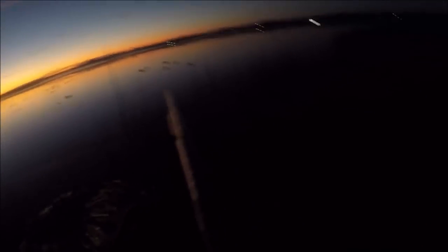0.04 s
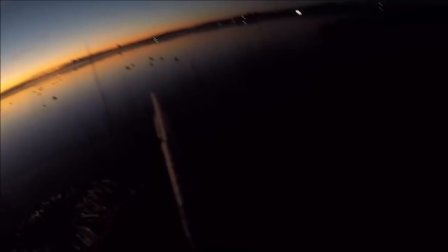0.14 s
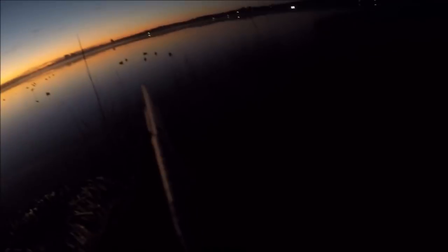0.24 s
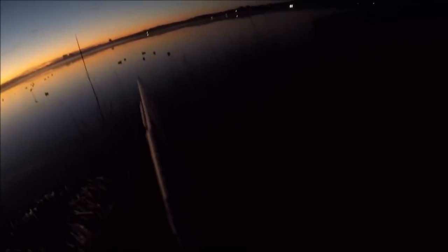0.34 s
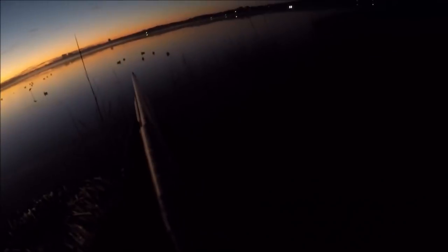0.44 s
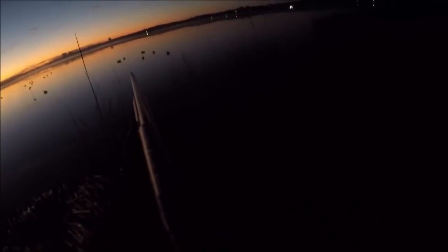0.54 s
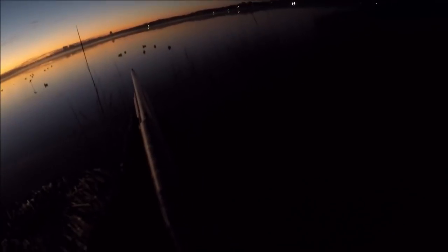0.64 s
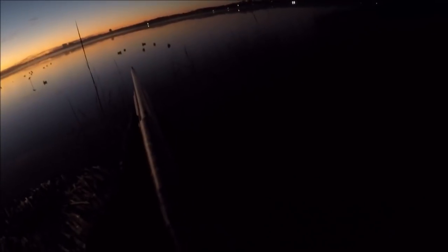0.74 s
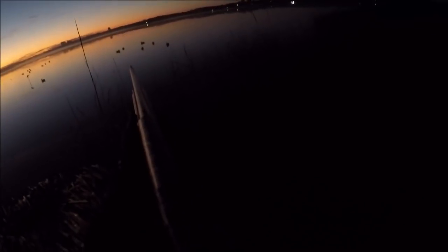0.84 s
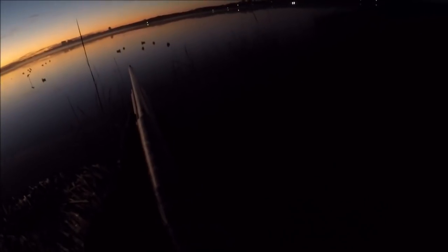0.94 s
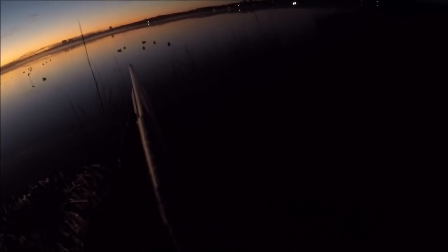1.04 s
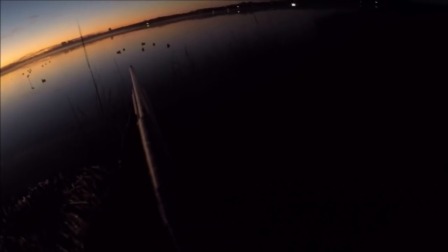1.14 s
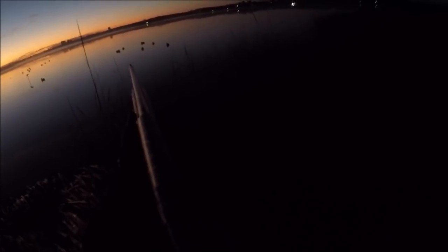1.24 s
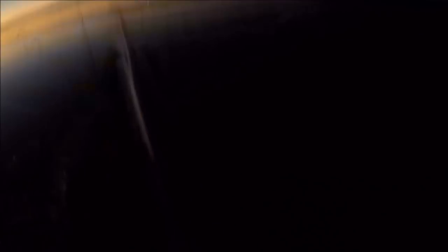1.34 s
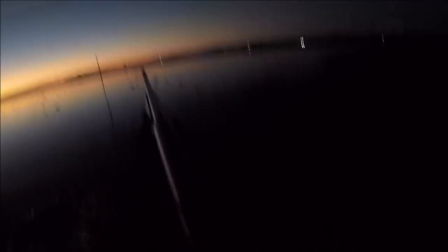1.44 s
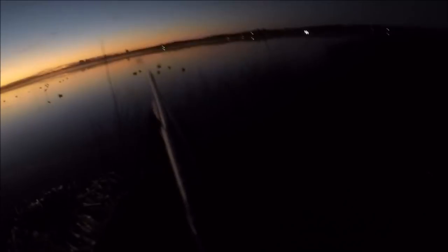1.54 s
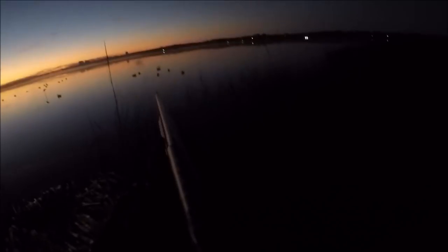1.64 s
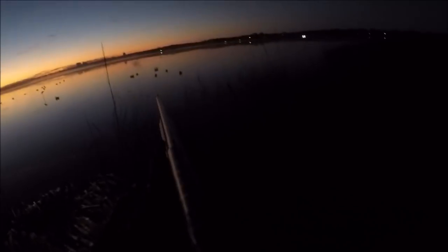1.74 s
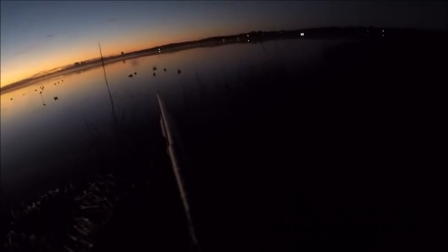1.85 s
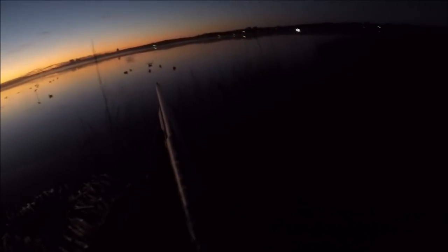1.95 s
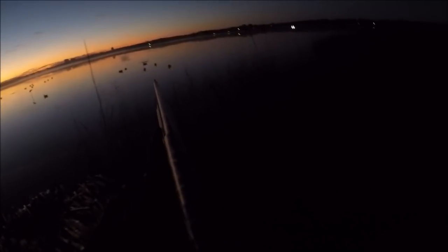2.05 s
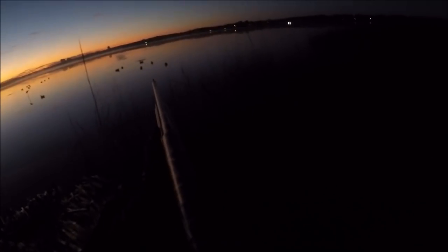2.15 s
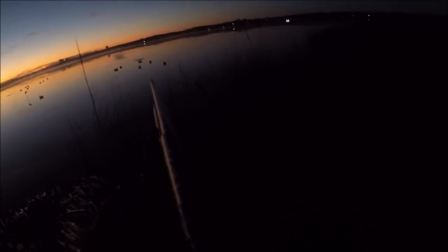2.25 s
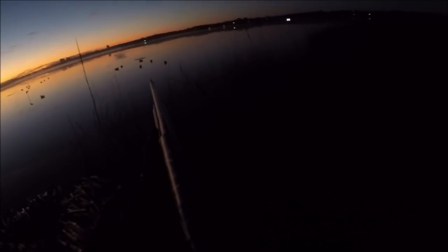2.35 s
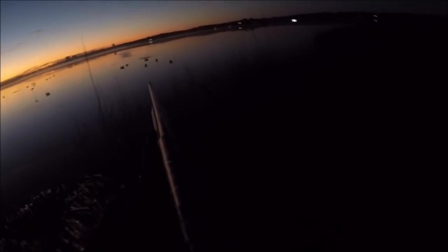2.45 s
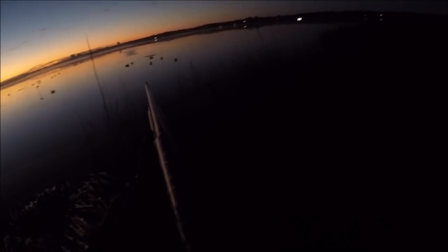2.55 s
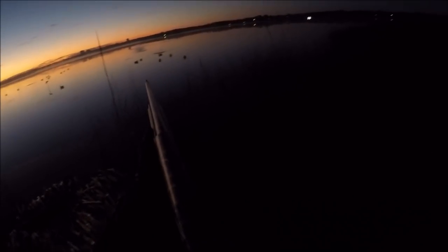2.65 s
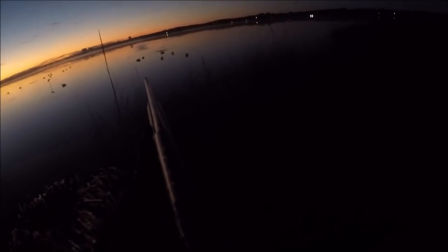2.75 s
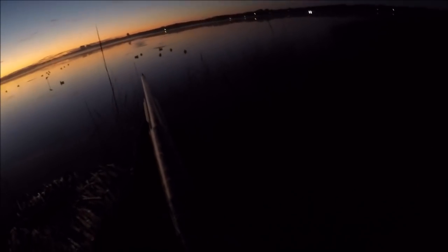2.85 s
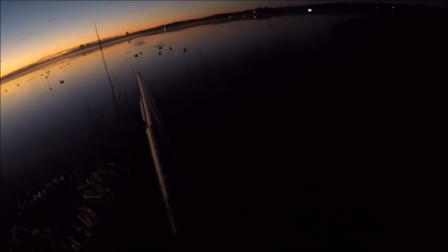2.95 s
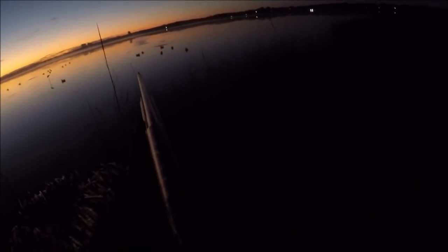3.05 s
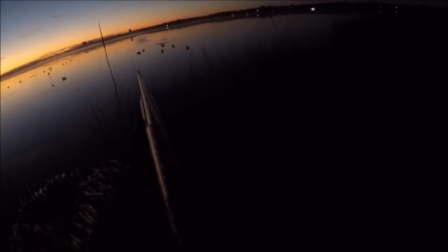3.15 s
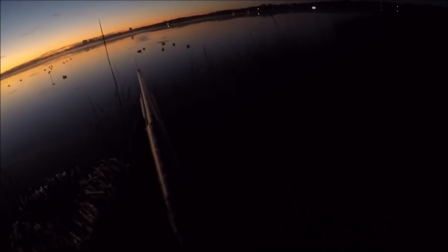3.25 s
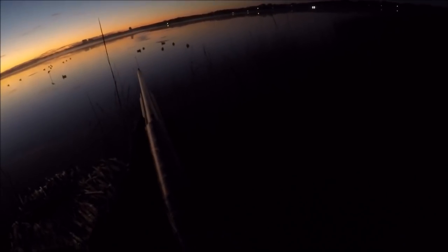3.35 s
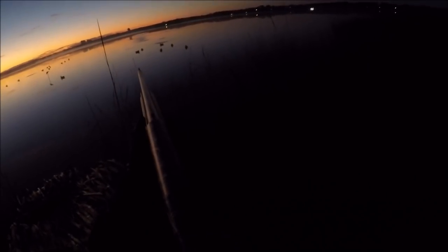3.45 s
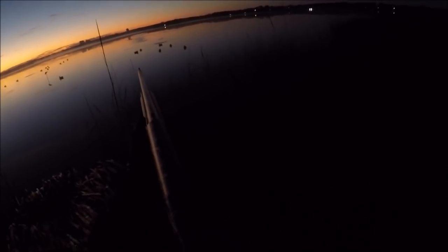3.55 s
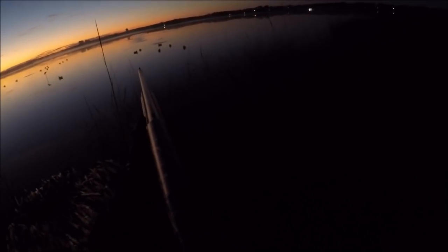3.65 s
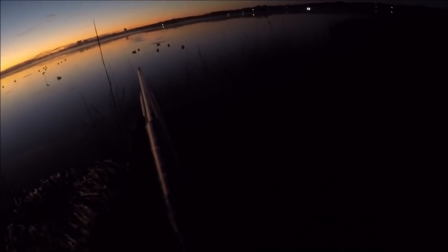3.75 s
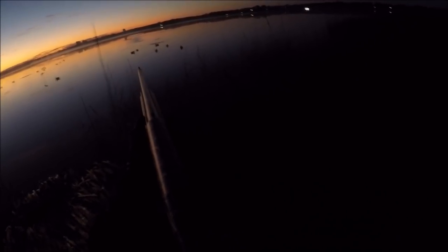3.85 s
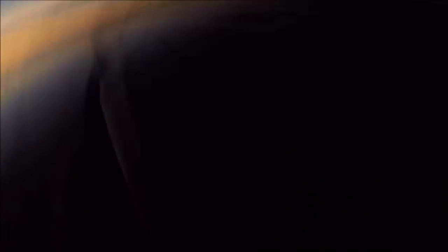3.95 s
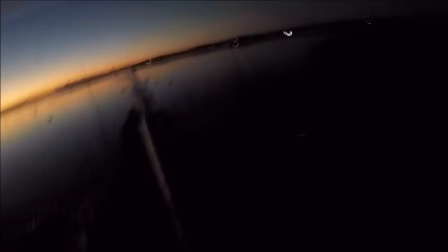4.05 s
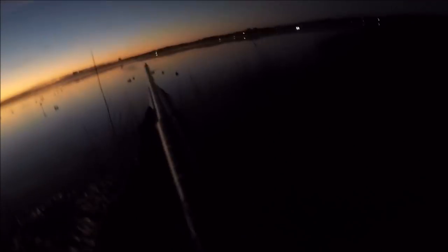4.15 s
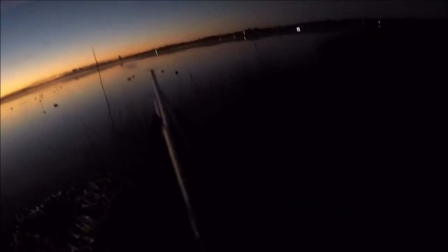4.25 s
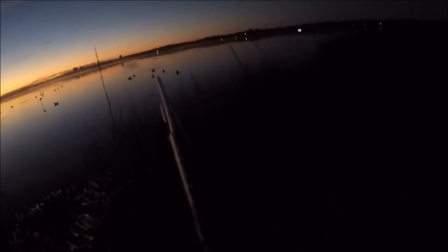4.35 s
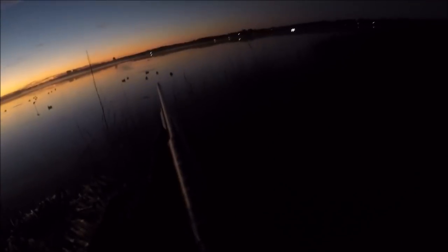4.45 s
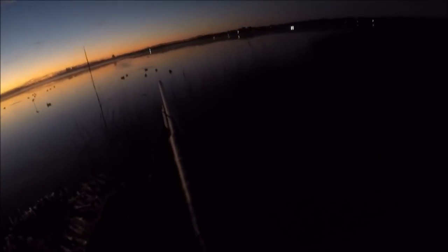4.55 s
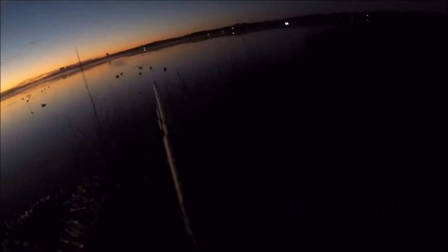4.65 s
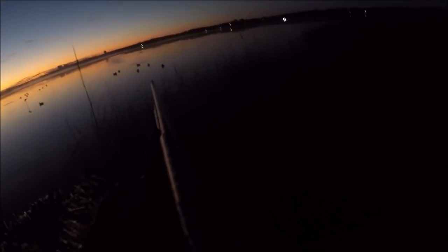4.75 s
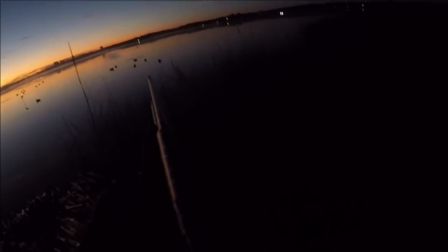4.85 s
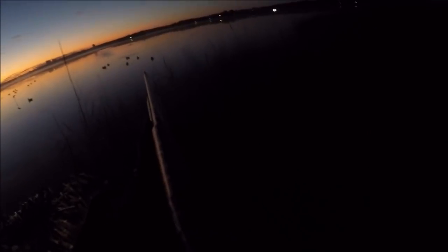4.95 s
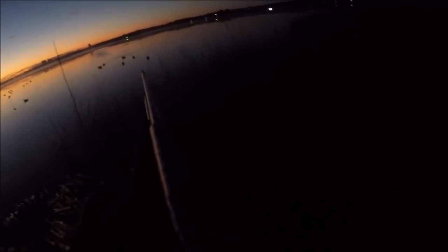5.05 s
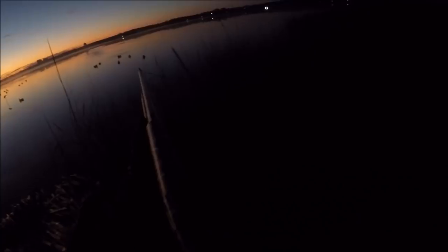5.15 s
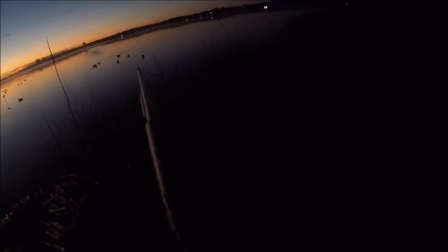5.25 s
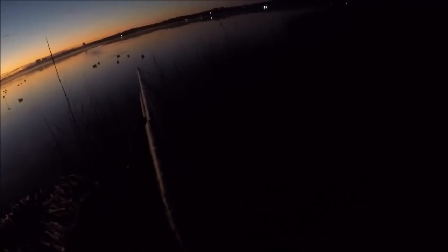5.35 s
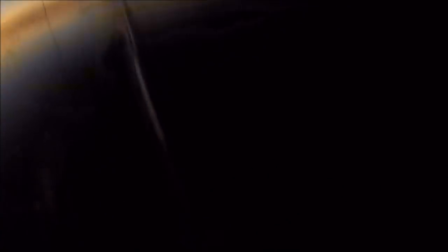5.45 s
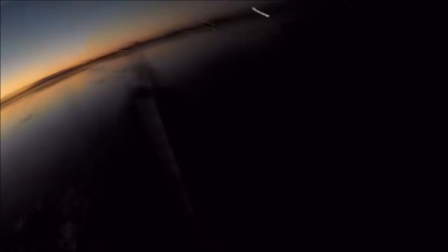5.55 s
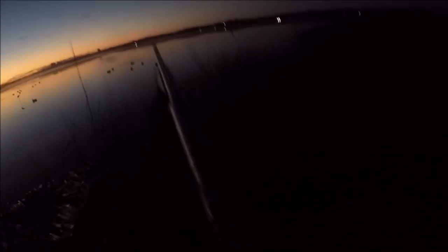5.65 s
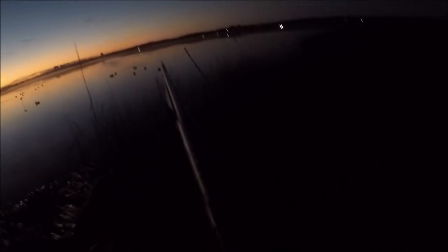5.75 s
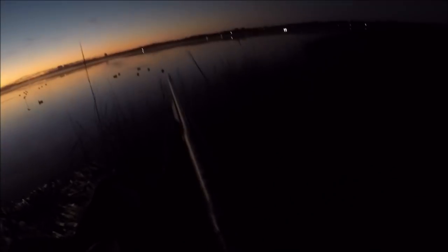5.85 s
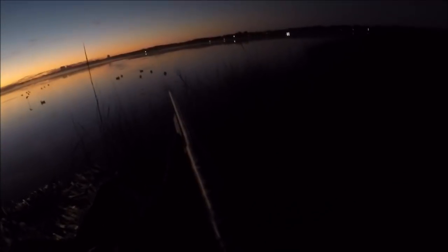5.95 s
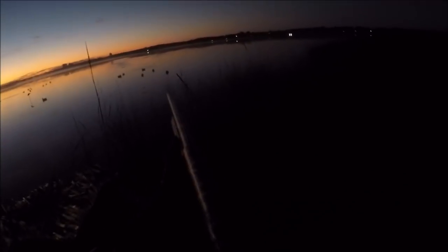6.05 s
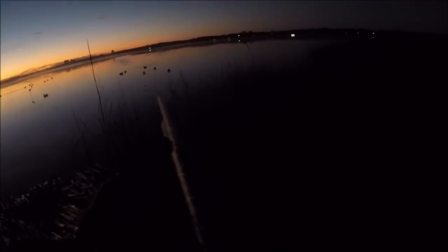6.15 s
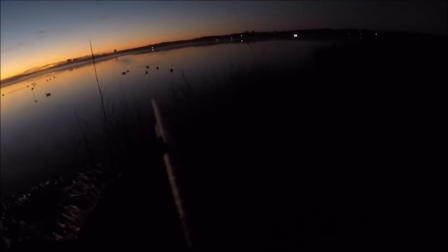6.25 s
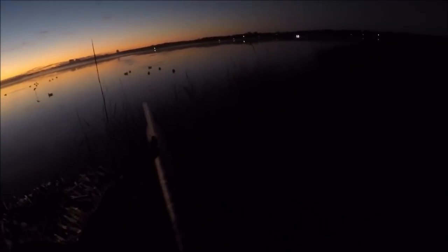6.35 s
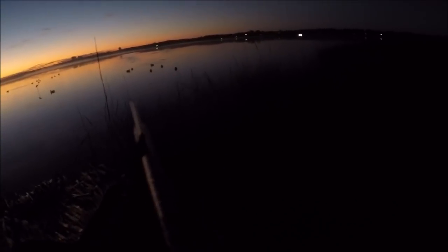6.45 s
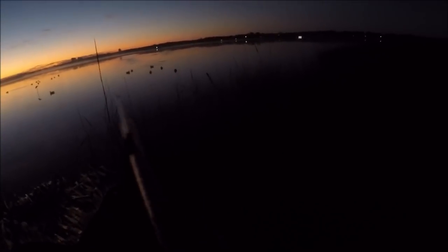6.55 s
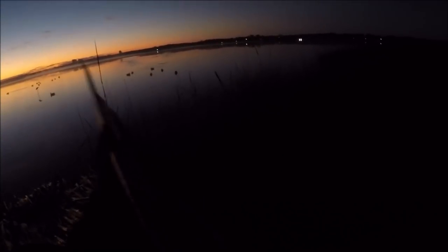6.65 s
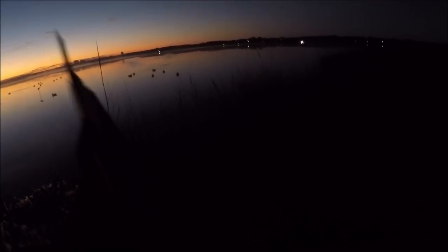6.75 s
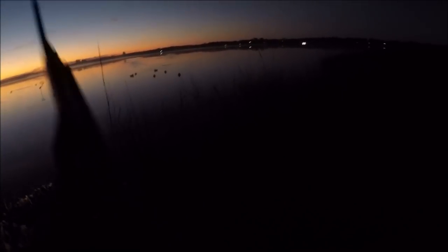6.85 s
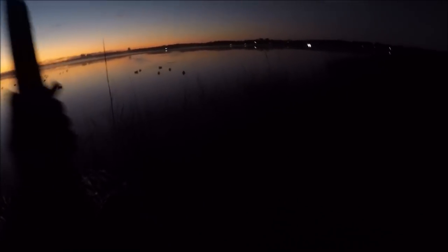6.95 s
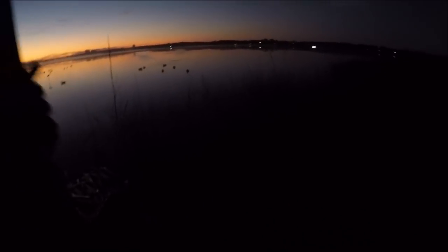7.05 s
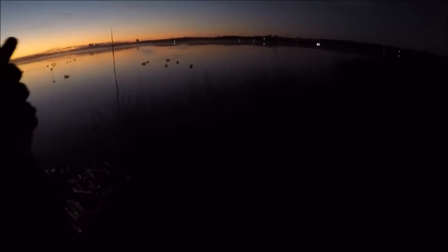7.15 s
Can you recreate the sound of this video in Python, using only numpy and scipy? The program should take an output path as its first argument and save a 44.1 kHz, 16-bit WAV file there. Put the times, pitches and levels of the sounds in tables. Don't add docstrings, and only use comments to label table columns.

```python
import sys
import numpy as np
from scipy import signal
from scipy.fft import rfft, irfft, next_fast_len
from scipy.io import wavfile

SR = 44100
rng = np.random.default_rng(int(sys.argv[2]) if len(sys.argv) > 2 else 0)


def store_wav(level_fs):
    pcm = np.round(np.clip(np.atleast_2d(level_fs), -1, 1) * 32767)
    wavfile.write(sys.argv[1], SR, pcm.T.astype(np.int16))


def gain_from_decibels(decibels):
    exponent = np.asarray(decibels, float) / 20
    return 10 ** exponent


N = 318181

# last_jolt_s, jolt_db, crack_db, duck_to_db, echo_db
SHOTS = [
    (1.3082, -19, -10.5, -22.5, 1.5),
    (3.906, -18, -12.5, -23, -1),
    (5.4228, -24, -12.5, -23.5, -4),
]
# hz, level_db_per_hz
CRACK = [(210, -32.5), (350, 0.5), (671, -7), (1210, -0.5), (1920, -5.5), (2720, -2.5), (4440, -3),
         (5210, -5.5), (7630, -7), (8940, -20.5), (13100, -26.5), (15600, -39)]
# hz, likeness (-1 to 1)
BLAST_LIKENESS = [(60, 0.89), (130, 0.86), (290, -0.86), (640, 0.76), (1410, -0.27), (3100, 0.69),
                  (6820, -0.49), (15000, -0.2)]


def rms_one(x):
    return x / np.sqrt(np.mean(x ** 2) + 1e-20)


def at_hz(points, hz):
    point_hz, value = np.transpose(points)
    return np.interp(np.log(hz), np.log(point_hz), value)


def panned(db):
    return gain_from_decibels([[db / 2], [-db / 2]])


def bandpass(order, low_hz, high_hz):
    return signal.butter(order, [low_hz, high_hz], "band", fs=SR, output="sos")


def drift(rate_hz):
    pole = np.exp(-80 * np.pi * rate_hz / SR)
    noise = rng.standard_normal(N // 40 + 2002)
    slow = rms_one(signal.lfilter([1], [1, -2 * pole, pole * pole], noise)[2000:])
    return np.interp(np.arange(N) / 40, np.arange(len(slow)), slow)


def coloured(spectrum, likeness, size):
    padded = next_fast_len(size, True)
    hz = np.maximum(np.fft.rfftfreq(padded, 1 / SR), 1)
    alike = np.clip(at_hz(likeness, hz), -.99, .99)
    mid, side = rfft(rng.standard_normal((2, padded)))
    both = np.sqrt(1 + alike) * mid + np.sqrt(1 - alike) * side * [[1], [-1]]
    return rms_one(irfft(both * gain_from_decibels(at_hz(spectrum, hz)), padded)[:, :size])


def envelope(t, db, rise_s, t60_s):
    rise = np.clip(1 + t / rise_s, 0, 1) ** 2
    fall = gain_from_decibels(-60 * np.maximum(t, 0) / t60_s)
    return np.where(t < 0, rise, fall) * gain_from_decibels(db)


def bursts(rows):
    t, gate = np.arange(-4000, 30000) / SR, np.zeros(N)
    for s, db, rise_s, t60_s in rows:
        at = int(s * SR)
        gate[at - 4000:at + 30000] += envelope(t, db, rise_s, t60_s)
    return gate * coloured(CRACK, BLAST_LIKENESS, N)


def swells(rows, pan_db, lag_rad=0):
    out, sides = np.zeros((2, N)), lag_rad * np.array([[.5], [-.5]])
    for s, hz, db, rise_s, fall_s in rows:
        start = int((s - .1) * SR)
        t = np.arange(start, start + 11000) / SR - s
        swell = np.exp(-.5 * (t / np.where(t < 0, rise_s, fall_s)) ** 2)
        wave = np.cos(2 * np.pi * hz * t + sides)
        out[:, start:start + 11000] += gain_from_decibels(db) * swell * wave * panned(pan_db)
    return out


def metal(rows, spread, snap_db, trim_db):
    out, t = np.zeros((2, N + 4000)), np.arange(4000) / SR - .0012
    flat = np.vstack([bandpass(3, 850, 8800), signal.butter(1, 3000, fs=SR, output="sos")])
    for s, db, hz, pan_db, t60_s in rows:
        noise = rng.standard_normal((3, 4000)) * envelope(t, 0, .0005, t60_s)
        burst = noise[0] + .32 * noise[1:]
        tone = signal.sosfilt(bandpass(2, hz / spread, hz * spread), burst)
        both = tone + gain_from_decibels(snap_db) * signal.sosfilt(flat, burst)
        at = int(s * SR)
        out[:, at:at + 4000] += both / np.abs(both).max() * gain_from_decibels(db + trim_db) * panned(pan_db)
    return out[:, :N]


def gain_control(now):
    duck_s, hold_s, recover_db_per_s, knee_db = .18, .56, 16.5, 2.5
    gain_db = np.zeros_like(now)
    for s, _, _, duck_db, _ in SHOTS:
        climb_db = duck_db + recover_db_per_s * np.maximum(now - s - hold_s, 0)
        back_db = -knee_db * np.log1p(np.exp(-climb_db / knee_db))
        gain_db = gain_db + np.clip((now - s) / duck_s, 0, 1) * (back_db - gain_db)
    return gain_db


def echo(now, late_s, db, rise_s, t60_s):
    return sum(envelope(now - shot[0] - late_s, db + shot[4], rise_s, t60_s) ** 2 for shot in SHOTS)


def shifting(now):
    # start_s, length_s, thump_db, cloth_db
    shifts = [(-.1, 0.33, -54, -50.5), (0.274, 0.093, -59.5, -61.5), (0.742, 0.48, -63.5, -69.5),
              (2.66, 0.2, -91.5, -85), (2.813, 0.21, -68, -78), (3.462, 0.22, -62, -73.5),
              (4.777, 0.11, -76, -81.5), (5.298, .12, -62, -88), (6.586, .35, -76.5, -76),
              (6.82, 0.52, -68, -76)]
    thump, cloth = 0, 0
    for s, length_s, thump_db, cloth_db in shifts:
        off = (now - s - length_s / 2) / (length_s / 2 + .046)
        hold = (1 + off ** 6) ** -3.0
        thump = thump + gain_from_decibels(2 * thump_db) * hold
        cloth = cloth + gain_from_decibels(2 * cloth_db) * hold
    return thump, cloth


def marsh():
    # hz, level_db_per_hz
    wind = [(8, -10.5), (15, 5.5), (30, 5), (50, -4), (75, -14.5), (120, -24), (170, -49.5)]
    # hz, level_db_per_hz
    rumble = [(76, -36), (130, -9), (200, -1), (263, -3), (303, -5), (339, -6.5), (600, -14.5), (780, -47),
              (1320, -120)]
    # hz, level_db_per_hz
    wash = [(500, -40.5), (700, -17.5), (900, -13.5), (1020, -4.5), (1180, -5), (1320, -6), (1450, -9),
            (1750, -9), (2000, -16.5), (2600, -22.5), (4000, -45)]
    # hz, level_db_per_hz
    hiss = [(1200, -24), (1800, -1), (2500, -4.5), (4200, -4.5), (4800, -6.5), (6500, -4.5), (8000, -14),
            (9500, -26.5), (12400, -49.5)]
    # hz, level_db_per_hz
    air = [(88, -23.5), (150, -5), (264, -13.5), (480, -15.5), (650, -16.5), (830, -20.5), (1350, -25),
           (4670, -38), (7600, -34.5), (10200, -36.5), (12000, -44.5), (13500, -50), (15600, -62)]
    # hz, level_db_per_hz
    ring = [(800, -34), (1000, -5), (1200, 0.5), (1400, -5), (1900, -32)]
    # hz, level_db_per_hz
    boom = [(45, -29.5), (80, -5), (130, -4.5), (230, 2.5), (300, -3.5), (420, -33.5)]
    # hz, likeness (-1 to 1)
    likeness = [(60, 0.92), (130, -0.059), (290, 0.3), (640, -0.18), (1410, -0.53), (3100, 0.32),
                (6820, -0.12), (15000, -0.63)]
    # time_s, level_db
    gust = [(0, -16), (.15, -0.5), (.4, 5.5), (.8, -1), (1.2, -3), (2.0, 2), (3.1, -3), (3.85, 4),
            (4.6, -0.5), (5.3, -2), (6.2, -3), (7.21, 1)]
    # full_gain_db, ducking_share, breeze_share
    beds = [
        (-46, 0.78, 0.75),
        (-66, 0.46, 0.26),
        (-66, 0.61, .5),
        (-71.5, .8, .6),
        (-59, 1, 0.11),
    ]
    # crest_after_shot_s, level_db, rise_s, t60_s
    echoes = [
        (.06, -48, .05, .6),
        (0.038, -49, 0.046, 1.58),
        (.27, -58, 0.23, 1.11),
        (0.19, -57.5, .2, 1.22),
    ]
    # crest_after_shot_s, level_db, rise_s, t60_s
    ring_echo = (0.5, -69.5, 0.5, 3)
    # crest_from_shot_s (negative is before), level_db, rise_s, t60_s
    boom_swell = (-0.02, -53, 0.23, 0.64)

    now = np.arange(0, N + 32, 32) / SR
    gain_db, gust_db = gain_control(now), np.interp(now, *np.transpose(gust))
    power = [gain_from_decibels(2 * (db + ducks * gain_db + gusts * gust_db)) for db, ducks, gusts in beds]
    for k, shape in enumerate(echoes):
        power[k] += echo(now, *shape)
    thump, cloth = shifting(now)
    power[1] += thump
    power[2] += gain_from_decibels(-4) * np.sqrt(thump * cloth)
    power[3] += cloth
    power[4] += gain_from_decibels(3.5) * cloth
    power += [echo(now, *ring_echo), echo(now, *boom_swell)]

    # spectrum, trim_db, wander_db, wander_hz
    layers = [(wind, 0, .73, 6.5), (rumble, -2, 1.2, 20.5), (wash, -1, .77, 12), (hiss, -4, 2.2, 70),
              (air, 0, .56, 2.4), (ring, 0, 1.2, 14), (boom, 0, 1.9, 25)]
    out = np.zeros((2, N))
    for bed_power, (spectrum, trim_db, wander_db, wander_hz) in zip(power, layers):
        level = np.interp(np.arange(N) / 32, np.arange(len(now)), np.sqrt(bed_power))
        out += level * gain_from_decibels(trim_db + wander_db * drift(wander_hz)) * coloured(spectrum, likeness, N)
    return out


def faint():
    # start_s, length_s, centre_hz, width_hz, rms_db
    faint_rows = [(1.711, 0.096, 1196, 220, -64), (1.44, .2, 110, 80, -59), (4.05, .12, 105, 50, -58),
                  (5.62, .09, 100, 50, -61), (1.34, .2, 250, 160, -50), (4.0, .25, 260, 160, -55),
                  (2.12, .09, 150, 100, -66), (5.62, .16, 1550, 500, -64), (5.6, .2, 300, 150, -60),
                  (4.749, .13, 1900, 401, -77.5), (2.675, 0.041, 5360, 2390, -70),
                  (2.728, 0.065, 5230, 2435, -72.5), (2.765, 0.025, 1820, 300, -69),
                  (2.78, .07, 2040, 300, -75), (2.87, 0.13, 2045, 240, -71), (3.02, 0.031, 2000, 200, -75),
                  (4.875, 0.04, 5400, 3000, -78), (6.624, 0.19, 6400, 3970, -73.5),
                  (2.763, .5, 510, 435, -65), (3.2, 0.52, 525, 436, -64), (6.852, 0.39, 710, 500, -69)]
    out = np.zeros((2, N + SR))
    due_s = np.arange(5.7, N / SR, .193)
    quacks = [(s, .096, 663 * partial, 130, -69.5 + .97 * gain_db)
              for s, gain_db in zip(due_s, gain_control(due_s)) for partial in (4, 5)]
    for s, length_s, hz, width_hz, db in [*faint_rows, *quacks]:
        at, size = int(s * SR), int(length_s * SR)
        band = bandpass(2, hz - width_hz / 2, hz + width_hz / 2)
        call = rms_one(signal.sosfilt(band, rng.standard_normal((2, 26000))))[:, -size:]
        out[:, at:at + size] += gain_from_decibels(db) * call * np.hanning(size) ** .5
    return out[:, :N]


def beacon():
    late_s = [3.09, 3.3, 4.63, 5.96]
    due_s = np.arange(.0218, N / SR - .01, .1024)
    late = np.abs(due_s[:, None] - late_s).min(axis=1) < .02
    pulses = np.zeros(N)
    pulses[((due_s + .007 * late) * SR).astype(int)] = gain_from_decibels(rng.normal(0, 1, len(due_s)))
    bump = np.exp(-.5 * (np.arange(-400, 401) / SR / .0014) ** 2)
    highpass = signal.butter(2, 24, "high", fs=SR, output="sos")
    tug = signal.sosfilt(highpass, np.convolve(pulses, bump, "same"))
    return tug * gain_from_decibels(-34 + gain_control(np.arange(N) / SR))


def knock():
    # start_s, level_db
    blows = [(0.064, -43), (.072, -38), (0.0805, -30), (0.084, -61), (0.0856, -24.5)]
    # hz, level_db, t60_s
    case = [(154, -10.5, 0.21), (200, 4.5, 0.12), (300, 5, 0.062), (348, 5.5, 0.054), (506, 1.5, 0.089),
            (710, -2.5, 0.03)]
    out, t = np.zeros(N), np.arange(12000) / SR
    ring = sum(gain_from_decibels(db - 60 * t / t60_s) * np.sin(2 * np.pi * hz * t) for hz, db, t60_s in case)
    for s, db in blows:
        at = int(s * SR)
        out[at:at + 12000] += gain_from_decibels(db - 5) * ring * np.minimum(t / .0021, 1)
    return out


def buckle():
    # start_s, peak_db
    ticks = [(6.19, -68.5), (6.2352, -60), (6.246, -66), (6.2664, -66), (6.2865, -60), (6.334, -56.5),
             (6.385, -69), (6.445, -71), (6.62, -60), (6.645, -66.5), (6.81, -64.5), (6.9237, -56)]
    return metal([(s, db, 1560, .5, .0097) for s, db in ticks], spread=1.18, snap_db=-7.5, trim_db=3)


def rattles():
    # start_s, peak_db, hz, left_right_db
    fittings = [(0.0044, -38.5, 1980, -12), (0.0776, -44.5, 2250, -20), (0.4665, -49.5, 5100, -5),
                (0.4992, -53, 1890, -9), (0.827, -47, 2470, -1), (1.6583, -49, 3720, 3),
                (1.6718, -46.5, 1920, -1), (1.697, -46, 2460, 3), (1.7485, -56, 2800, -6),
                (2.0795, -64, 2040, 3), (2.1494, -67, 2850, 8), (4.0215, -50, 3202, -3),
                (4.2146, -55, 4270, 2), (4.255, -49, 2820, 2), (4.283, -56, 3550, 6),
                (4.3019, -49, 3740, -3), (4.348, -50, 2894, 4), (4.438, -54, 2010, 6.5),
                (4.6175, -53.5, 2674, 2.5), (4.288, -58, 5000, 1), (4.326, -61, 3700, 1),
                (4.339, -61, 6500, 1), (4.3445, -58, 2900, 1), (4.399, -64, 6500, 1), (4.448, -65, 3000, 1),
                (5.8445, -59.5, 6020, 1), (5.942, -65, 6000, 1), (5.961, -68, 4500, 1),
                (6.038, -67, 2790, 1), (6.198, -68, 2203, 1), (4.897, -68, 1700, 1), (4.925, -70, 2500, 1),
                (1.712, -58, 6500, 1), (.371, -57, 6500, -3), (1.352, -38, 4000, 1), (1.427, -49, 3000, 1),
                (3.947, -41, 2500, 1), (5.872, -59, 1900, -1), (5.5424, -51, 5720, 4),
                (5.8487, -55.5, 2480, 1.5), (5.8655, -55, 4000, -4), (5.985, -61, 4240, -7.5),
                (6.0092, -57.5, 4010, 0.5), (4.36, -57, 4000, -1.5), (4.4544, -65, 2300, 0),
                (4.553, -69, 2500, 1), (6.8688, -56, 1900, -1.5)]
    # start_s, peak_db, hz, left_right_db, t60_s
    bolt = [(4.0662, -46.5, 6100, -2, 0.015), (4.077, -45, 2800, 0, 0.017), (1.3, -52, 6500, 0, 0.022)]
    rows = [(*row, .01) for row in fittings] + [*bolt]
    return metal(rows, spread=1.35, snap_db=1.5, trim_db=3)


def shells():
    # start_s, peak_db, hz, left_right_db, t60_s
    shell_rows = [(0.044, -42, 1560, -10, 0.025), (0.14, -40.5, 1740, -11, 0.026),
                  (4.376, -50.5, 1280, -14, 0.033), (4.842, -56, 1300, -3, .022),
                  (5.897, -44, 1500, -14.5, 0.024), (6.896, -51, 1260, -8, 0.053)]
    return metal(shell_rows, spread=1.45, snap_db=-10.5, trim_db=-1.5)


def action():
    # start_s, peak_db, hz, left_right_db, t60_s
    strikes = [(1.499, -30, 5140, -4, 0.053), (1.5054, -32.5, 3780, 1, 0.055), (4.0906, -33, 6616, 6, 0.07),
               (4.0974, -33, 3950, 0, 0.037), (5.4651, -38, 4144, 2, 0.06)]
    return metal(strikes, spread=1.4, snap_db=-8, trim_db=-2.5)


def recoil():
    # crest_s, hz, peak_db, rise_s, fall_s
    stock = [
        (1.309, 141.5, -17, 0.0079, 0.0065),
        (3.9098, 143.9, -13.5, 0.012, 0.0031),
    ]
    # left_right_db, right_lag_rad
    stock_sides = [(6, .6), (2.5, .3)]
    # crest_s, hz, peak_db, rise_s, fall_s
    barrel = [
        (1.3245, 270, -21.5, 0.0074, .008),
        (3.9222, 250, -26.5, 0.013, 0.0044),
        (5.4403, 230, -24.5, 0.0081, 0.0041),
        (5.4243, 560, -25, 0.0029, 0.0049),
    ]
    # crest_s, hz, peak_db, rise_s, fall_s
    heaves = [(1.355, 22.5, -39, .02, 0.036), (3.955, 26.2, -39, .02, 0.032),
              (5.455, 11.2, -31.5, .012, 0.019), (5.503, 80, -29, 0.005, .003),
              (1.405, 27, -43.5, .012, 0.016), (1.49, 31, -42, 0.014, 0.02), (4.165, 38, -47, .012, 0.012)]
    # crest_s, hz, peak_db, rise_s, fall_s
    rebounds = [(5.4368, 99.8, -24, 0.0019, .005), (5.512, 45, -28.5, .004, 0.016)]
    # peak_db, left_right_db
    spring = [(-36, -12), (-37, -4.5), (-41.5, 4)]
    out = swells(barrel, pan_db=-1, lag_rad=.5001)
    out += swells(heaves, pan_db=-3.5, lag_rad=.4) - swells(rebounds, pan_db=1.3, lag_rad=.7)
    for row, (pan_db, lag_rad) in zip(stock, stock_sides):
        out += swells([row], pan_db, lag_rad)
    for shot, (db, pan_db) in zip(SHOTS, spring):
        out += swells([(shot[0] - .001, 7920, db, .0096, .006)], pan_db)
    return out


def hammer():
    # crest_s, rms_db, rise_s, t60_s
    clicks = [(1.2727, -43.5, .002, 0.013), (1.278, -29, 0.0021, 0.012), (3.8698, -46, 0.0016, 0.013),
              (3.8758, -31, .002, 0.008), (5.391, -31, 0.00087, 0.005), (5.395, -44, .001, 0.007)]
    return bursts(clicks)


def jolts():
    # hz, level_db_per_hz
    jolt_spectrum = [(210, -29), (400, -4), (850, 2), (1530, -9.5), (2670, -11), (4370, -9.5), (5500, -17),
                     (7400, -23.5), (9100, -34), (15600, -51)]
    # from_last_jolt_s, from_last_jolt_db, rise_s, t60_s
    train = [(-.0206, -19.5, .001, 0.028), (-.0103, -6, .001, .02), (-.0045, -12, .002, .016),
             (0, 0.5, .001, 0.014)]
    bright_by_shot_db = [4, .1, 2.5]
    out, t = np.zeros((2, N)), np.arange(-400, 2000) / SR
    for (s, jolt_db, *_), bright_db in zip(SHOTS, bright_by_shot_db):
        colour = [(hz, db + bright_db * (hz > 2000)) for hz, db in jolt_spectrum]
        shared = coloured(colour, BLAST_LIKENESS, 2400)
        for late_s, db, rise_s, t60_s in train:
            jolt = shared + .76 * coloured(colour, BLAST_LIKENESS, 2400)
            at = int((s + late_s) * SR)
            out[:, at - 400:at + 2000] += jolt * envelope(t, jolt_db + db, rise_s, t60_s)
    return out


def receiver():
    # hz, level_db, t60_s, right_lag_rad
    modes = [(520, -8, .014, .6), (700, -7.5, 0.014, .9), (950, -6.5, .01, 1.4), (1350, -9.5, .008, 3),
             (2100, -7, .006, .8), (2750, -2.5, .007, -0.32), (3450, -1.5, .008, 0.07),
             (4300, -2.5, .007, 0.4), (5500, -1.5, .006, 1.58), (6800, -7, .005, 1.5),
             (11000, -17, .003, 2.5), (14000, -19, .003, 2.3)]
    # from_last_jolt_s, from_jolt_or_crack_db, extra_low_mode_db
    fronts = [(-.0206, -21, 5), (-.0103, -4, 6), (0, 1.5, 5.5), (.0062, -1.5, -6), (.0071, -5, -6),
              (.0097, -8, -6), (.0107, -1.2, -3), (.0117, -4, -3)]
    grip_by_shot_db = [(-4, 4, 2.5, 4), (-5, -3, 4, -1.5), (6, 1.5, -9, 1.5)]
    out, t = np.zeros((2, N)), np.arange(1500) / SR
    hz, mode_db, t60_s, lag_rad = np.transpose(modes)[:, :, None]
    for (s, jolt_db, crack_db, *_), grip_db in zip(SHOTS, grip_by_shot_db):
        held_db = mode_db + np.pad(grip_db, (0, len(hz) - len(grip_db)))[:, None]
        for late_s, db, low_db in fronts:
            hit_db = db + held_db + low_db * (hz < 1700)
            if late_s > .004:
                hit_db, rise_s = hit_db + crack_db, .0001
            else:
                hit_db, rise_s = hit_db + jolt_db - 12 * (hz > 6000), .0004
            at = int((s + late_s) * SR)
            for side in (0, 1):
                scatter_db = 2.5 * rng.standard_normal(hz.shape)
                level = gain_from_decibels(hit_db + scatter_db - 60 * t / t60_s)
                ring = (level * np.sin(2 * np.pi * hz * t - side * lag_rad)).sum(axis=0)
                out[side, at:at + 1500] += ring * np.minimum(t / rise_s, 1)
    return out


def muzzle():
    # from_last_jolt_s, from_crack_db, rise_s, t60_s
    stages = [
        (0.0064, -4, 0.00023, 0.002),
        (.011, -5, 0.0002, 0.0024),
        (.0066, -7, 0.0005, .011),
        (.0112, -6, .0007, .012),
        (0.013, -20.5, 0.0023, 0.028),
        (0.0093, -15.5, .04, 0.046),
        (0.0073, -32.5, 0.012, .34),
    ]
    return bursts([(shot[0] + late_s, shot[2] + db, rise_s, t60_s)
                   for shot in SHOTS for late_s, db, rise_s, t60_s in stages])


def scene():
    behind_body = signal.butter(3, 8000, fs=SR, output="sos")
    clicks = signal.sosfilt(behind_body, buckle() + rattles() + shells())
    background = marsh() + faint() + beacon() + knock()
    return background + clicks + action() + recoil() + hammer() + jolts() + receiver() + muzzle()


def top_cut(x):
    return signal.sosfilt(signal.butter(12, 15740, fs=SR, output="sos"), x)


def record(dry):
    steep = signal.cheby2(20, 60, 15900, fs=SR, output="sos")
    rounded = .79 * np.tanh(dry / .71)
    return top_cut(signal.sosfilt(steep, rounded))


dry = scene()
out = record(dry)
store_wav(out)
```